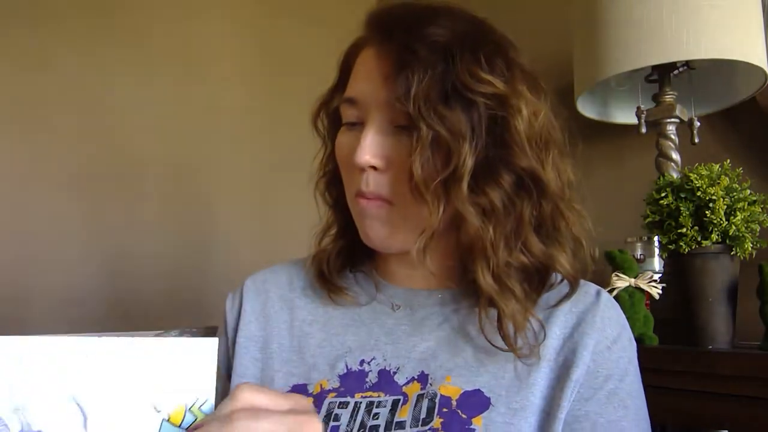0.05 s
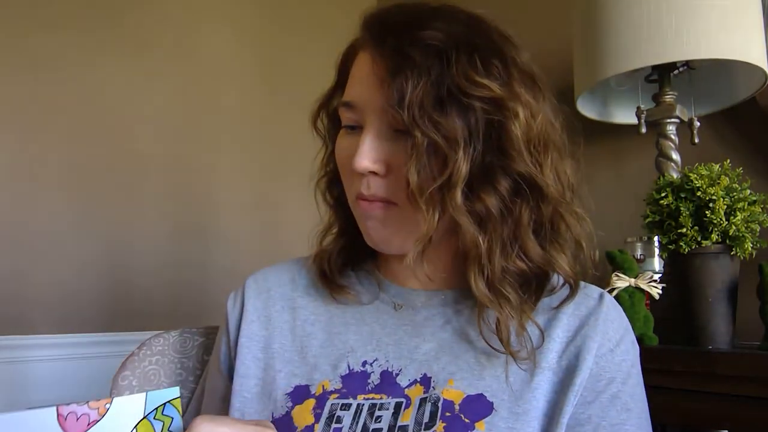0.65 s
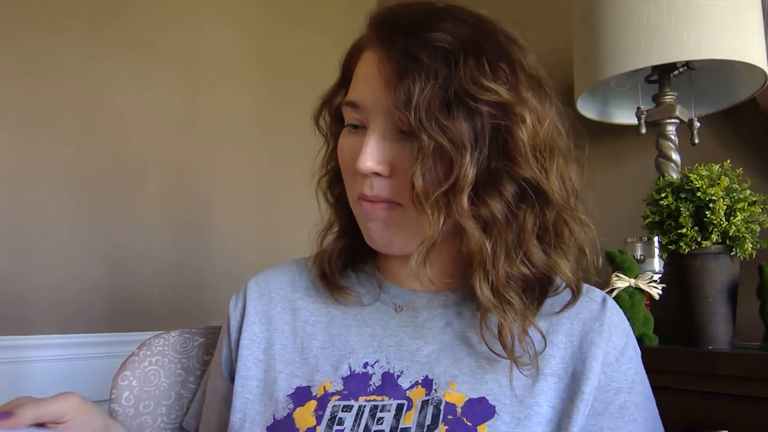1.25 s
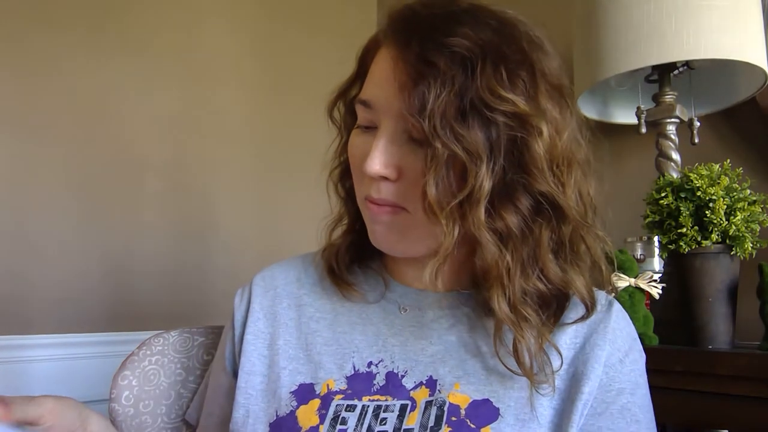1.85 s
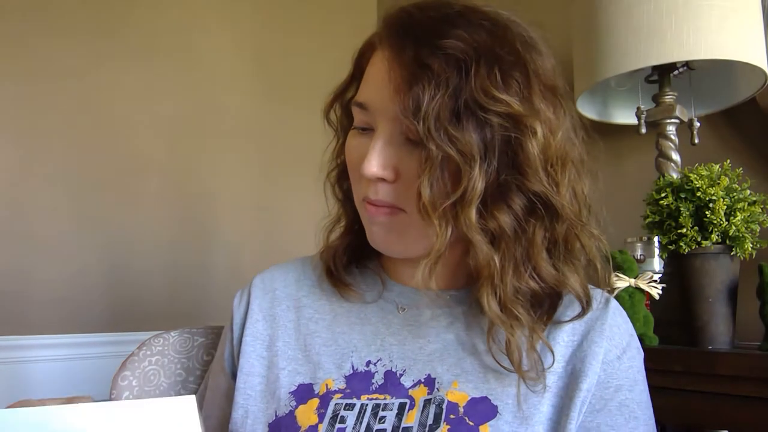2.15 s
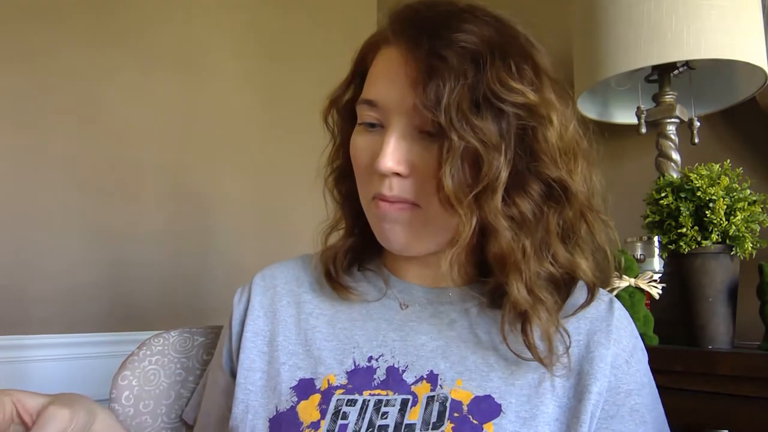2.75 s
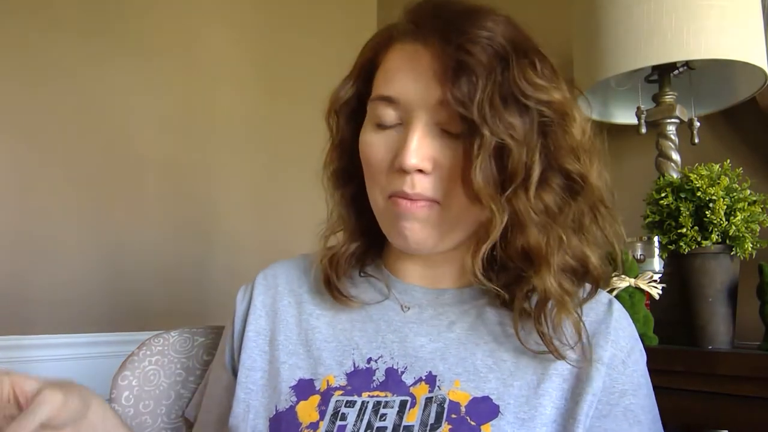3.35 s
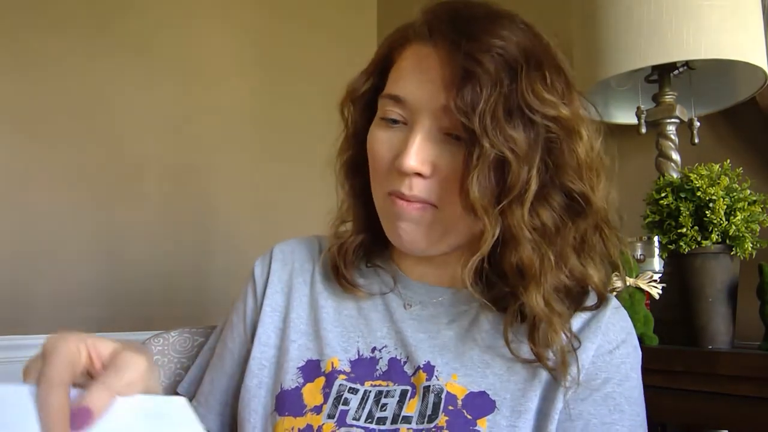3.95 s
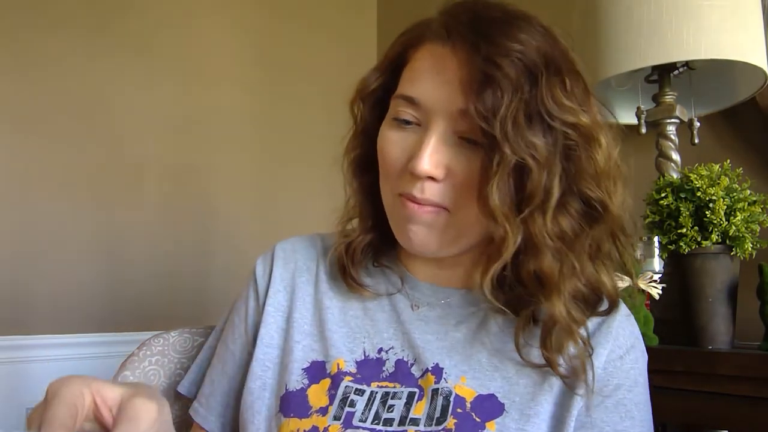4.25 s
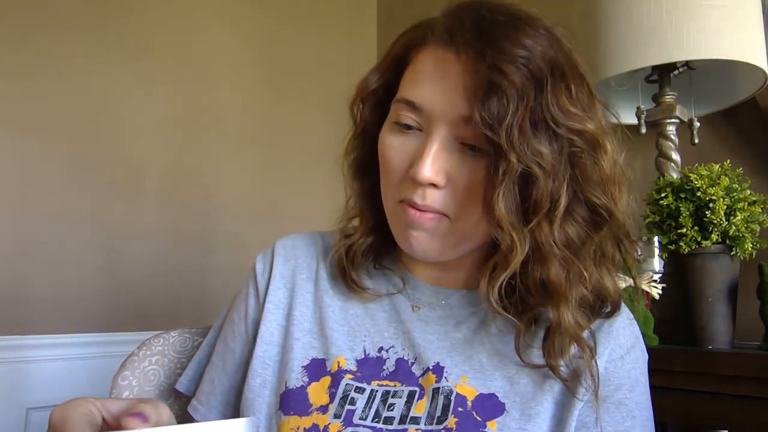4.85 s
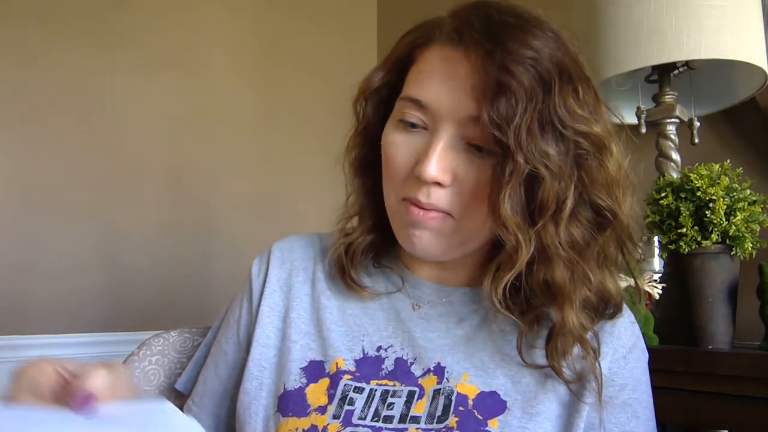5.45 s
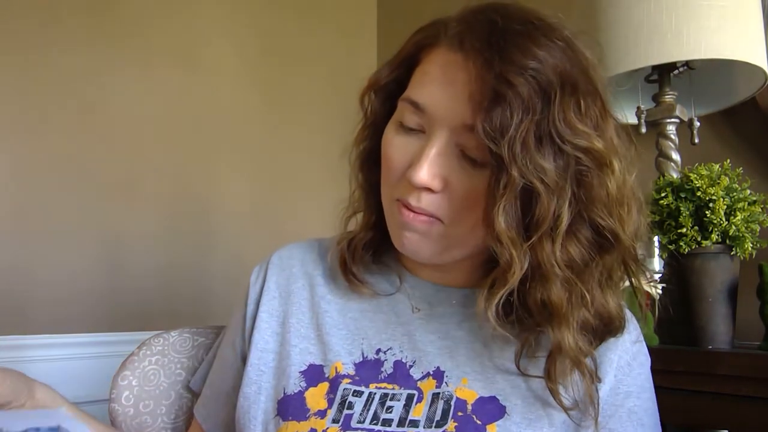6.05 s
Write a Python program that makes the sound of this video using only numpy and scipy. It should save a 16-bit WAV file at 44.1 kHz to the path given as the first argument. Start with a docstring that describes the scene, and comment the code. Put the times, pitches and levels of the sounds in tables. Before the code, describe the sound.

Someone leafs through a picture book in a quiet living room. Hands rub and tap the cover while stiff pages slide and flap in uneven strokes. About a second and a half in, the spine gives one loud, short creak. More swishes, taps and crisp page snaps follow, with a few soft puffs of air. The book is close to a stereo microphone, slightly left, with a short echo.

```python
"""Stiff pages swish, flap and snap as someone leafs through a picture book, with one loud creak.
Paper and hands rub by catching and letting go, bending sheets buckle, and fingers tap the boards.
The creak is the glued spine slipping and shaking the cover. Swinging pages puff air at a small
stereo microphone. The book lies just to its left, in a quiet living room with a short echo."""
import sys
import numpy as np
from scipy import signal
from scipy.fft import rfft, irfft, next_fast_len
from scipy.io import wavfile
from scipy.ndimage import uniform_filter1d, map_coordinates

SR = 44100
rng = np.random.default_rng(int(sys.argv[2]) if len(sys.argv) > 2 else 0)


def materialize(psi):
    """Save the field psi as 16-bit PCM at rate SR to the path in sys.argv[1].

    A 1-D psi becomes a single channel; in a 2-D psi each row is a channel.
    """
    bounded = np.clip(np.atleast_2d(psi).T, -1, 1)
    quanta = np.round(bounded * 32767).astype(np.int16)
    wavfile.write(sys.argv[1], SR, quanta)


N = 273155

# A sheet slides over its neighbour; rustle and treble are counted from the hiss level:
# start_s, length_s, hiss_db, swell_db (start to end), rustle_db, treble_db
PAGE_SLIDES = [(-0.02, 0.12, -43.5, 10.5, 2.5, -9), (0.282, 0.061, -56.5, -13, 6, -2),
               (0.378, 0.13, -69, 9, 12, -12), (0.619, 0.22, -41, 9, 5, -6),
               (0.93, .12, -52, 15.5, 2.5, -25), (1.232, 0.1, -49.5, -7, 2, 2.5),
               (1.411, 0.21, -52, 2, 4, 2.5), (1.651, 0.042, -43, 4, 1.5, -7),
               (1.851, 0.28, -47.5, -6, 5, 4), (2.244, 0.3, -48.5, 3, 5, 5.5),
               (2.551, 0.14, -43.5, 4.5, 3.5, 7.5), (2.767, 0.097, -50, 4, 5.5, -5),
               (2.929, .11, -56.5, -10, 1.5, -38), (3.317, 0.32, -46.5, -19, 2.5, 5),
               (3.633, 0.2, -42, -3, -1.5, -1.5), (3.884, 0.038, -38.5, -4.5, 0, 1),
               (3.978, 0.073, -44.5, -6, -2, -2), (4.097, 0.11, -46.5, 8, -1.5, -7.5),
               (4.344, 0.094, -50.5, -0.5, 1, -2.5), (4.512, 0.089, -57.5, -7, 2, -11),
               (4.9, 0.16, -66, -4, 2, -16), (5.117, 0.17, -54, 14.5, 7, 7.5),
               (5.334, .14, -39.5, 4, -1, -0.5), (5.478, 0.17, -44, 10, -2.5, 0.5),
               (5.767, .13, -50, 8.5, -1, 2.5), (5.992, 0.086, -44, 0.5, 1.5, -28),
               (6.133, .07, -46, -2, -10.5, 0)]
# A hand drags on the boards: start_s, length_s, level_db, swell_db (start to end)
HAND_DRAGS = [(0.0, 0.29, -47.5, 1.5), (.42, .17, -49, -7.5), (.62, 0.45, -48.5, -3.5),
              (1.24, 0.071, -43, -13.5), (1.86, 0.28, -46.5, 4), (2.25, 0.093, -42, -2.5),
              (2.55, 0.11, -41.5, 2.5), (2.78, 0.037, -42.5, 11), (3.12, 0.018, -36.5, -8),
              (3.325, 0.15, -38, -3), (3.53, 0.5, -46, -9.5), (4.12, 0.15, -48, 3),
              (4.53, 0.24, -53, -18.5), (5.76, 0.085, -44, 2)]
# A sheet bends and flips through: peak_s, level_db, pitch_hz, rise_s, fall_s
PAGE_FLAPS = [(.167, -27.5, 644, 0.0087, .014), (.407, -36.5, 1630, 0.0067, 0.0059),
              (.462, -22, 1180, 0.0019, 0.0057), (.645, -30, 2220, 0.013, 0.014),
              (0.737, -31.5, 2550, .014, 0.023), (.835, -34.5, 900, .014, 0.013),
              (1.261, -32, 835, 0.0053, 0.026), (1.597, -6.5, 1350, .015, 0.0095),
              (1.687, -38.5, 3780, 0.018, 0.011), (1.786, -30.5, 3740, 0.0019, 0.0039),
              (1.934, -26.5, 1400, .01, 0.0094), (2.315, -30, 1094, 0.046, 0.014),
              (3.465, -28.5, 582, 0.021, .007), (3.784, -17.5, 990, 0.0055, 0.0091),
              (3.902, -25, 960, 0.013, 0.014), (3.997, -24.5, 950, 0.011, 0.0071),
              (4.152, -31.5, 1090, 0.04, 0.025), (4.199, -12.5, 1400, 0.0032, 0.0031),
              (4.245, -18.5, 1790, 0.0033, .0035), (4.546, -30, 970, 0.018, .005),
              (4.935, -49, 2600, 0.01, .14), (5.421, -32, 2300, 0.039, .02),
              (5.459, -22.5, 1470, 0.0053, 0.006), (5.616, -30.5, 980, 0.014, .016),
              (5.78, -35, 1050, 0.055, 0.056), (5.938, -35, 1350, 0.021, 0.0054)]
# Fingers, boards and page edges hit: start_s, ring_db, pitch_hz, thud_db, crack_db
SHARP_TAPS = [(0.0894, -24, 1220, -28, -59), (0.144, -20, 840, -67, -62), (0.1636, -23, 1340, -29.5, -55),
              (0.367, -40, 1020, -48, -85), (0.459, -57, 1490, -43, -88), (0.979, -37.5, 1520, -44, -63),
              (1.0146, -25.5, 2780, -61, -39), (1.0164, -20.5, 2660, -69, -53),
              (1.553, -25, 3330, -37, -20), (1.594, -20, 2240, -43, -32), (1.8558, -28.5, 2140, -34, -52),
              (1.923, -23, 1780, -46, -56), (2.787, -28.5, 840, -48, -58), (2.8206, -29.5, 1880, -34, -47),
              (3.0726, -34.5, 3170, -41, -41), (3.121, -27, 1460, -33.5, -33.5),
              (3.328, -34, 1000, -30, -49), (3.445, -26.5, 706, -33.5, -37), (3.474, -33, 750, -44, -47),
              (3.651, -29, 2400, -35, -16), (3.832, -29, 2750, -36.5, -41), (3.986, -29, 910, -35, -34),
              (4.492, -36.5, 1630, -44.5, -70), (4.5345, -31.5, 1060, -37, -74),
              (4.7092, -50, 916, -43, -55.5), (4.964, -35, 1850, -46.5, -77),
              (5.347, -33.5, 1050, -46, -64), (5.3815, -23, 1800, -38, -49), (5.453, -31.5, 900, -31, -60),
              (5.7196, -25, 2750, -35.5, -31), (6.0029, -24, 1480, -46, -47.5)]
# The glued spine gives way in small slips: start_s, level_db
SPINE_SLIPS = [(1.5676, -4), (1.5835, -19), (1.5833, -5), (1.5883, -6), (1.591, -31.5), (1.5984, 1.5),
               (1.603, -33), (1.612, -42.5)]
# The tones of the cover when a slip knocks it: pitch_hz, width_hz, relative_db
COVER_TONES = [(494, 23, 9), (630, 150, 2.5), (1033, 67, 23.5), (1400, 75, 15), (1900, 110, -10.5),
               (2600, 600, -61)]
# The tones that linger in the cover: pitch_hz, relative_db
COVER_RING = [(479, -8), (829, 2.5), (888, -5.5), (958, 1), (1020, -5), (1070, 1.5), (1136, -1.5),
              (1198, 2.5), (1255, -2), (1457, 1)]
# A swinging sheet fans the microphone: centre_s, level_db, pitch_hz
AIR_PUFFS = [(1.589, -31.5, 42.7), (2.995, -24.5, 45.8), (3.036, -32.5, 28), (3.082, -27, 24.4),
             (3.145, -25.5, 50), (3.785, -30.5, 60.7), (5.458, -29, 65)]

# The tone colour (how much bass and treble) of each noise: frequency_hz, relative_db
DRAG_COLOUR = [(60, -19), (150, -7.5), (210, 0), (350, -4), (600, -2), (850, -5.5), (1400, -21),
               (3000, -39.5), (6000, -120)]  # hand on board
RUSTLE_COLOUR = [(100, -75.5), (650, -8), (1100, -4), (1900, -0.5), (2400, -2), (3000, -2), (4000, -21),
                 (6500, -20), (12000, -120)]  # bending paper
HISS_COLOUR = [(1400, -34), (3200, 3), (4400, 7.5), (5500, 6.5), (7000, 1.5), (9500, -0.5), (12000, -5),
               (15000, 0.5), (16400, -15)]  # paper on paper
CRACK_COLOUR = [(500, -28), (2000, -11), (3800, -7), (6000, -1), (9000, 1), (12000, -1), (15500, 2),
                (17000, -4)]  # the sharp edge of a tap
AIR_COLOUR = [(8, 1.5), (25, 2), (50, -7), (80, -4.5), (130, -3), (200, -16), (500, -61), (1000, -120)]  # moving air
BACKGROUND_COLOUR = [(18, -22.5), (30, -7.5), (287, -12), (499, -25), (600, -27), (1010, -32), (1430, -35),
                     (3220, -43), (16000, -49)]  # the quiet room

# How much weaker the book is on the far, right side: frequency_hz, gain_db
RIGHT_SHADE = [(100, -3), (400, -3), (1000, -6.5), (2400, -11), (4500, -11.5), (9000, -14), (15000, -16.5)]
# Bounces off the table top and nearby surfaces: left_delay_s, right_delay_s, gain_db
CLOSE_ECHOES = [(.0009, 0.0024, -46.5), (.0026, 0.0018, -21.5), (.0043, 0.0024, -23)]
# How long the room's echo takes to fade by 60 dB: frequency_hz, fade_s
ROOM_FADE = [(150, .33), (1000, .3), (3000, .22), (7000, .18), (14000, .12)]
# How strongly the room answers: frequency_hz, gain_db
ROOM_COLOUR = [(100, -9.5), (500, -5), (1200, -7), (3000, -10.5), (7000, -15.5), (15000, -16.5)]


def rubbing(judder_db=3.0, treble_hz=8500, flex_db=-13):
    """Hands drag on the boards while sheets bend and slide over each other, in uneven strokes."""
    *_, rustle_db, treble_db = np.transpose(PAGE_SLIDES)
    drag = drag_force() * friction(DRAG_COLOUR, catches_per_s=200, grain_db=-0.5, patchy_db=-2.5)
    bending = np.hypot(slide_force(rustle_db), amp(flex_db) * drag_force())  # hands bend sheets too
    rustle = bending * friction(RUSTLE_COLOUR, catches_per_s=300, grain_db=-2.0, patchy_db=9.5)
    hiss = friction(HISS_COLOUR, catches_per_s=1500, grain_db=-4, patchy_db=6.0)
    treble = filtered(hiss, lambda hz: 1 - low_pass(hz, treble_hz, 4))
    swish = slide_force() * (hiss - treble) + slide_force(treble_db) * treble
    return amp(judder_db * wobble(45)) * (drag + rustle + swish)


def friction(colour, catches_per_s, grain_db, patchy_db):
    """Fibres catch and let go: tiny clicks on a smooth rub, whose tone shifts as the sheet bends."""
    catches = (rng.random(N) < catches_per_s / SR) * rng.standard_normal(N)
    rub = rng.standard_normal(N) + amp(grain_db) * unit(catches)
    spectrum = signal.stft(rub, nperseg=512)[2]
    patches = uniform_filter1d(rng.standard_normal(spectrum.shape), size=3, axis=0)  # smooth in pitch
    patches = uniform_filter1d(patches, size=15, axis=1)  # and in time
    gain = amp(patchy_db * np.tanh(1.1 * unit(patches)))  # damped paper has no sharp peaks
    return coloured(signal.istft(spectrum * gain, nperseg=512)[1][:N], colour)


def slide_force(extra_db=0):
    """How hard the sheets rub, with an extra gain for each slide."""
    start_s, length_s, hiss_db, swell_db, _, _ = np.transpose(PAGE_SLIDES)
    slides = zip(start_s, length_s, hiss_db + extra_db, swell_db)
    return strokes(slides, attack_s=0.0066, release_s=0.028)


def drag_force(sheet_db=-10):
    """How hard the boards are rubbed, by hands and by sliding sheets."""
    hands = strokes(HAND_DRAGS, attack_s=0.012, release_s=0.037)
    return np.hypot(hands, amp(sheet_db) * slide_force())


def strokes(rows, attack_s, release_s, grip_s=0.006, graze_db=-18.5, before_s=.03, after_s=0.13):
    """Each stroke grazes lightly, takes hold, swells or eases, then lets go and grazes again."""
    power, t = np.zeros(N), np.arange(-SR // 4, SR) / SR
    for start_s, length_s, level_db, swell_db in rows:
        level = amp(level_db + swell_db * (np.clip(t / length_s, 0, 1) - .5))
        past_end_s = np.maximum(t - length_s, 0)
        press = .5 * (1 + np.tanh((t - grip_s) / attack_s)) * np.exp(-past_end_s / release_s)
        graze = amp(graze_db) * np.exp(np.minimum(t, 0) / before_s - past_end_s / after_s)
        add(power, start_s + t[0], (level * np.maximum(press, graze)) ** 2)
    return np.sqrt(power)


def page_flaps(buckles_per_s=1800, width_ratio=0.67, cutoff_ratio=1.81):
    """A bending sheet lets off a burst of tiny buckles, which make it ring at a rough pitch."""
    out, t = np.zeros(N), np.arange(-SR // 4, SR // 4) / SR
    for peak_s, level_db, pitch_hz, rise_s, fall_s in PAGE_FLAPS:
        buckles = (rng.random(len(t)) < buckles_per_s / SR) * np.sign(rng.standard_normal(len(t)))
        sheet = filtered(buckles, lambda hz: resonance(hz, pitch_hz, width_ratio * pitch_hz)
                         * low_pass(hz, cutoff_ratio * pitch_hz, 4))
        swell = np.exp(np.minimum(t / rise_s, -t / fall_s))
        add(out, peak_s + t[0], amp(level_db) * unit(sheet * swell) * rms(swell))
    return out


def spine_creak(ring_start_s=1.585, ring_db=-37, fade_s=0.74):
    """A quick run of slips in the glue beats the cover like a drum, and the cover rings on."""
    out, t = np.zeros(N), np.arange(SR // 2) / SR
    click = 1. * (t == 0)
    knock = filtered(click, lambda hz: sum(amp(db) * resonance(hz, pitch_hz, width_hz)
                                           for pitch_hz, width_hz, db in COVER_TONES))
    knock = filtered(knock, lambda hz: 1 / (1 + 1j * hz / 2800) ** 3)  # soften the treble
    for start_s, level_db in SPINE_SLIPS:
        add(out, start_s + rng.normal(0, 0.00029), amp(level_db) * knock / np.abs(knock).max())
    # the flexing cover pulls its tones slightly out of tune
    drift = lambda: np.cumsum(rng.normal(0, .004, len(t))) + rng.random()
    ring = sum(amp(db) * np.sin(2 * np.pi * (hz * t + drift())) for hz, db in COVER_RING)
    envelope = amp(ring_db - 60 * t / fade_s) * (1 - np.exp(-t / .008))
    add(out, ring_start_s, envelope * ring)
    return out


def taps(ring_cycles=0.4, thud_hz=330, thud_s=0.0015, chatter_db=-20, chatter_s=0.0048,
         crack_s=.0013, flutter_db=-17, flutter_s=0.003):
    """Each hit is a brief ring of the sheet, a thud of the board and a crack, then a short chatter."""
    out, t = np.zeros(N), np.arange(SR // 12) / SR
    at_level = lambda x, db: amp(db) * x / rms(x[t < .005])  # set by the first 5 ms
    tone = lambda hz, decay_s: np.sin(2 * np.pi * hz * t) * np.exp(-t / decay_s) * (1 - np.exp(-hz * t))
    crack_fade = np.exp(-t / crack_s) + amp(flutter_db) * np.exp(-t / flutter_s)
    for start_s, ring_db, pitch_hz, thud_db, crack_db in SHARP_TAPS:
        contact = amp(chatter_db) * rng.standard_normal(len(t)) * np.exp(-t / chatter_s)
        contact[0] = 1  # the hit itself
        ring = signal.fftconvolve(tone(pitch_hz, ring_cycles / pitch_hz), contact)[:len(t)]
        thud = signal.fftconvolve(tone(thud_hz, thud_s), contact)[:len(t)]
        crack = coloured(rng.standard_normal(len(t)), CRACK_COLOUR) * crack_fade
        add(out, start_s, at_level(ring, ring_db) + at_level(thud, thud_db) + at_level(crack, crack_db))
    return out


def air_puffs():
    """A swinging page makes one slow push and pull of air, felt mostly on the left."""
    out, t = np.zeros(N), np.arange(-SR // 8, SR // 8) / SR
    for centre_s, level_db, hz in AIR_PUFFS:
        swing = np.sin(2 * np.pi * hz * t) * np.exp(-2 * (hz * t) ** 2)
        add(out, centre_s + t[0], amp(level_db) * swing)
    return amp([[0], [-14]]) * out


def air_swirls(stir_db=-20.5, stir_exponent=0.58, lag_s=0.01, swirl_db=-7.5, swirl_s=0.02):
    """The rubbed book stirs the air and each puff makes swirls: a low rumble, stronger on the left."""
    t, carry = np.arange(N) / SR, np.exp(-1 / (lag_s * SR))
    motion = signal.lfilter([1 - carry], [1, -carry], drag_force())
    stirred = amp(stir_db) * motion ** stir_exponent
    swirls = sum(amp(db + swirl_db) * np.exp(-np.abs(t - centre_s) / swirl_s)
                 for centre_s, db, _ in AIR_PUFFS)
    shared = coloured(rng.standard_normal(N), AIR_COLOUR)
    per_side = coloured(rng.standard_normal((2, N)), AIR_COLOUR)
    per_side = filtered(per_side, lambda hz: low_pass(hz, 70, 2))  # only slow swirls differ by side
    return np.hypot(stirred, swirls) * (amp([[-1], [-7]]) * shared + amp([[1], [-11]]) * per_side)


def microphone(book, right_lag_s=13 / SR, scatter_share=.7, scatter_hz=2000):
    """Both sides hear the book and close echoes; the right is later, duller and partly scattered."""
    delay = lambda hz, seconds: np.exp(-2j * np.pi * hz * seconds)
    share = lambda hz: scatter_share * hz ** 2 / (hz ** 2 + scatter_hz ** 2)  # grows toward the treble
    left_echoes = lambda hz: sum(amp(db) * delay(hz, s) for s, _, db in CLOSE_ECHOES)
    right_echoes = lambda hz: sum(amp(db) * delay(hz, s) for _, s, db in CLOSE_ECHOES)
    left = filtered(book, lambda hz: 1 + left_echoes(hz))
    right = filtered(book, lambda hz: np.sqrt(1 - share(hz)) * delay(hz, right_lag_s) + right_echoes(hz))
    right += filtered(page_scatter(book), lambda hz: np.sqrt(share(hz)) * delay(hz, right_lag_s))
    return np.array([left, filtered(right, lambda hz: amp(look_up(RIGHT_SHADE, hz)))])


def page_scatter(book, decay_s=0.0081, shifts_per_s=7):
    """Sound takes four short paths over the moving pages, and these fade into one another."""
    t = np.arange(SR // 50) / SR
    paths = rng.standard_normal((4, len(t))) * np.exp(-t / decay_s)
    paths /= np.linalg.norm(paths, axis=1, keepdims=True)
    weights = np.array([wobble(shifts_per_s) for _ in paths])
    heard = signal.fftconvolve(book[None], paths, axes=1)[:, :N]
    return np.sum(heard * weights, axis=0) / np.linalg.norm(weights, axis=0)


def room_echo(book, delay_s=.005):
    """Walls and furniture answer with a blurred echo whose treble dies first, duller on the right."""
    hz, t, noise = signal.stft(rng.standard_normal((2, SR // 2)), SR, nperseg=256)
    fade_s = look_up(ROOM_FADE, hz)[:, None]
    decay = amp(-60 * t / fade_s) * (1 + 0.27 * np.exp(-t / 0.021))  # near surfaces answer first
    decay /= np.sqrt(np.mean(decay ** 2, axis=1, keepdims=True) * SR / 2)
    tail = signal.istft(noise * decay * amp(look_up(ROOM_COLOUR, hz))[:, None], SR, nperseg=256)[1]
    delayed = np.pad(book, (round(delay_s * SR), 0))
    left, right = signal.fftconvolve(delayed[None], tail, axes=1)[:, :N]
    return np.array([left, filtered(right, lambda hz: amp(look_up(RIGHT_SHADE, hz) / 2))])


def background(level_db=-69.5):
    """A faint, steady, low hush on both sides."""
    return amp(level_db) * coloured(rng.standard_normal((2, N)), BACKGROUND_COLOUR)


def amp(db):
    """Turn decibels into a number to multiply by."""
    return 10 ** (np.asarray(db) / 20)


def rms(x):
    """The average strength of a sound (root mean square)."""
    return np.sqrt(np.mean(x ** 2) + 1e-20)


def unit(x):
    """Scale a sound to an average strength of 1."""
    return x / rms(x)


def look_up(table, hz):
    """Read between a table's rows, on a log frequency scale."""
    row_hz, values = np.transpose(table)
    return np.interp(np.log(hz + 1), np.log(row_hz + 1), values)


def wobble(points_per_s):
    """A smooth curve through random points."""
    points = rng.standard_normal(int(N * points_per_s / SR) + 4)
    return map_coordinates(points, [np.arange(N) * points_per_s / SR])


def filtered(x, response):
    """Scale and delay each frequency of a sound as response(hz) says."""
    length = x.shape[-1]
    padded = next_fast_len(length + 8192)
    return irfft(rfft(x, padded) * response(np.fft.rfftfreq(padded, 1 / SR)), padded)[..., :length]


def coloured(x, colour):
    """Give a sound a tone colour, at an average strength of 1."""
    return unit(filtered(x, lambda hz: amp(look_up(colour, hz))))


def low_pass(hz, cutoff_hz, steepness):
    """A response that keeps the lows and fades the highs."""
    return 1 / (1 + (hz / cutoff_hz) ** steepness)


def resonance(hz, pitch_hz, width_hz):
    """The response of something that rings at one pitch."""
    return 1j * hz * width_hz / (pitch_hz ** 2 - hz ** 2 + 1j * hz * width_hz)


def add(track, start_s, sound):
    """Mix a sound into the track at a given time."""
    start = round(start_s * SR)
    sound = sound[max(-start, 0):]
    part = track[max(start, 0):][:len(sound)]
    part += sound[:len(part)]


def scene():
    """Mix the book, the room and the moving air in stereo."""
    book = rubbing() + taps() + page_flaps() + spine_creak()
    echo = room_echo(book)
    hush = background()
    return microphone(book) + echo + air_swirls() + air_puffs() + hush


def record(dry, top_hz=16150):
    """Cut off peaks beyond full scale, then remove the highest treble."""
    return filtered(np.clip(dry, -1, 1), lambda hz: low_pass(hz, top_hz, 150))


dry = scene()
out = record(dry)
materialize(out)
```